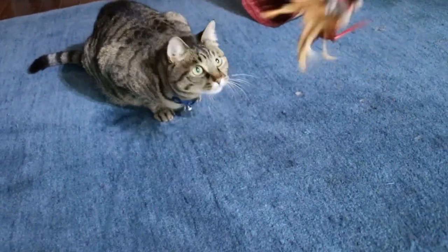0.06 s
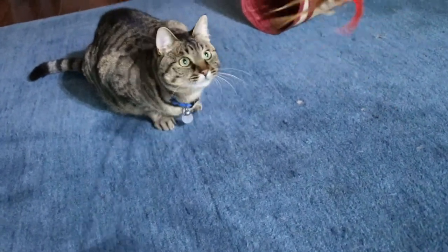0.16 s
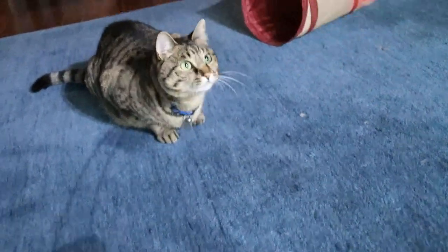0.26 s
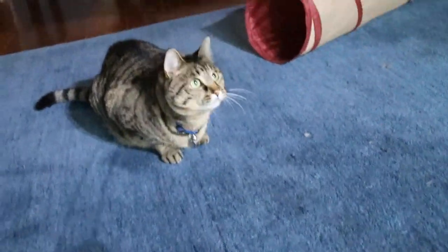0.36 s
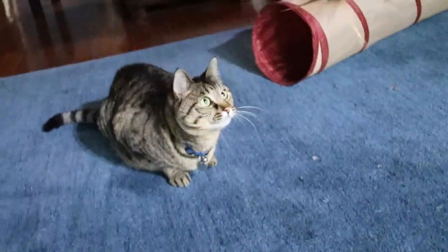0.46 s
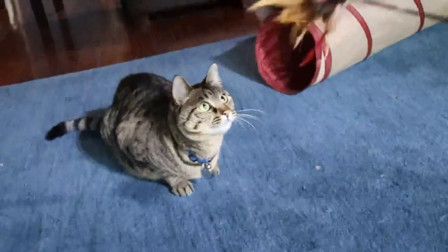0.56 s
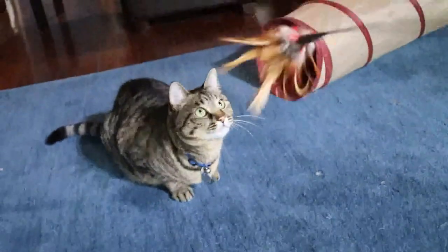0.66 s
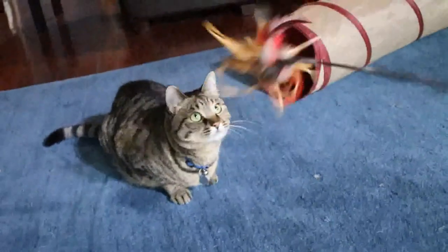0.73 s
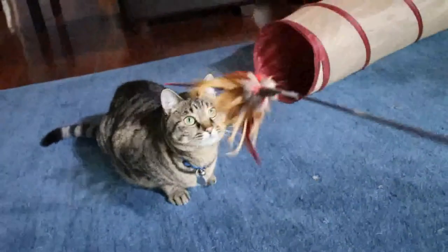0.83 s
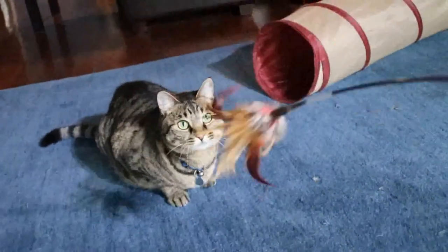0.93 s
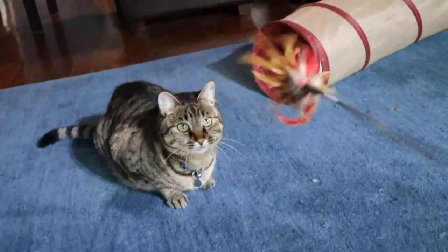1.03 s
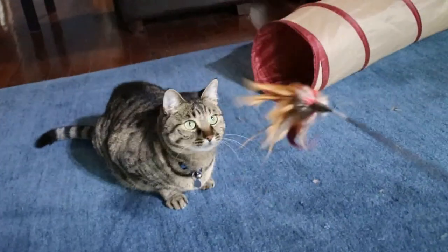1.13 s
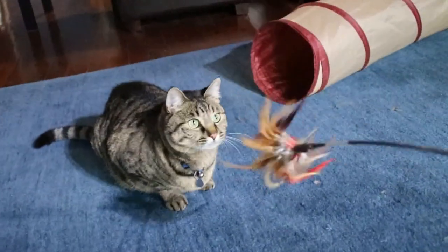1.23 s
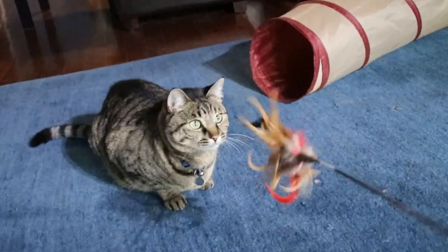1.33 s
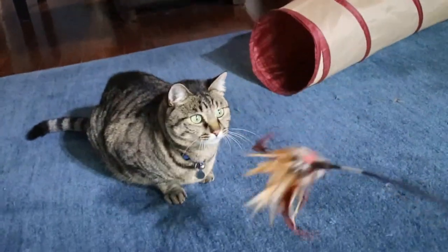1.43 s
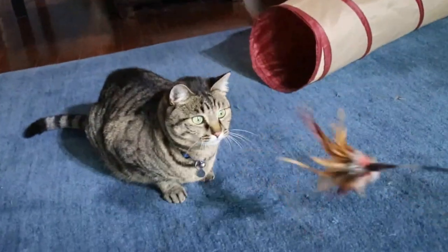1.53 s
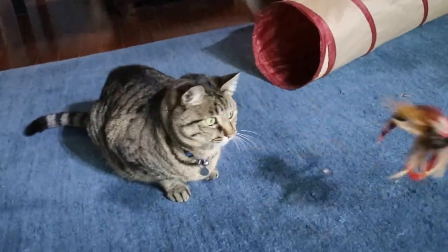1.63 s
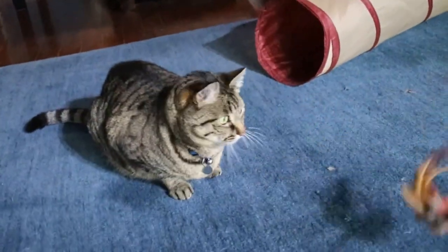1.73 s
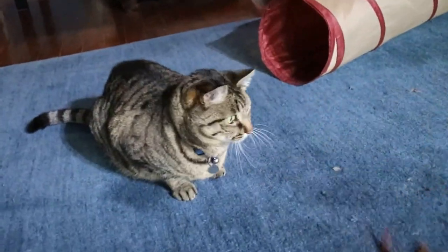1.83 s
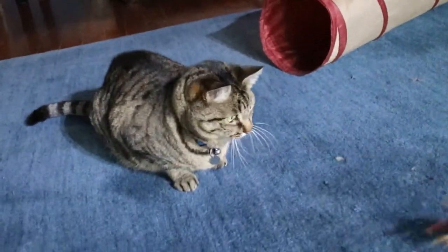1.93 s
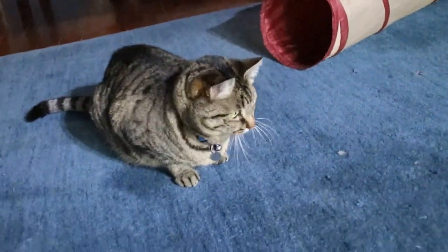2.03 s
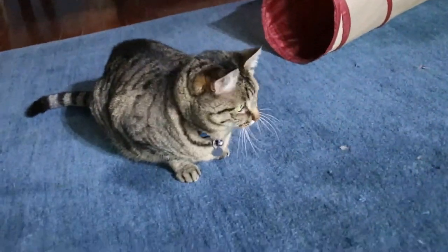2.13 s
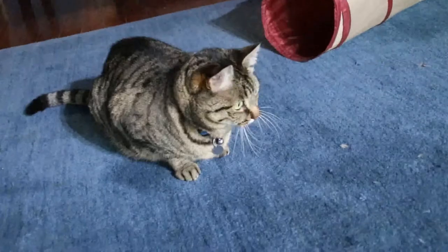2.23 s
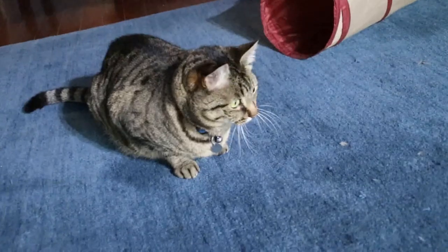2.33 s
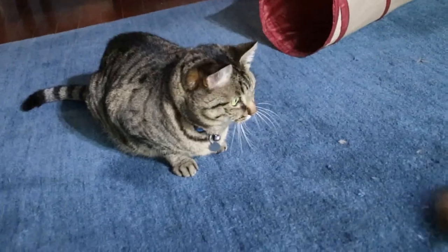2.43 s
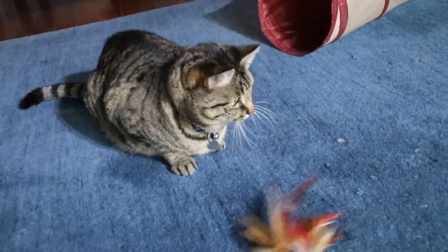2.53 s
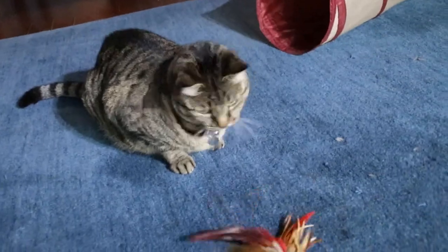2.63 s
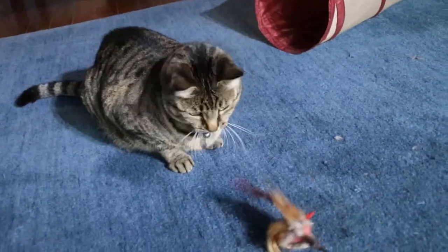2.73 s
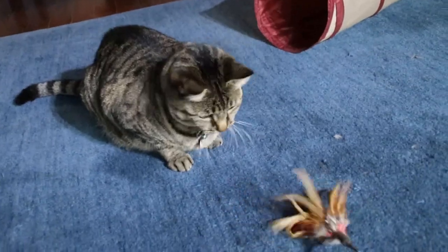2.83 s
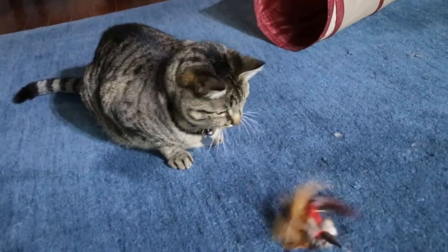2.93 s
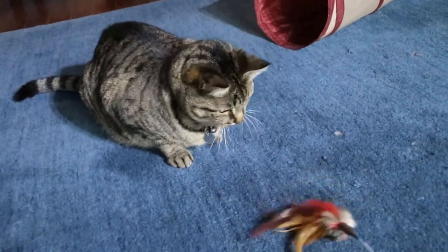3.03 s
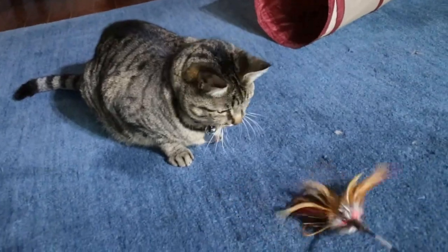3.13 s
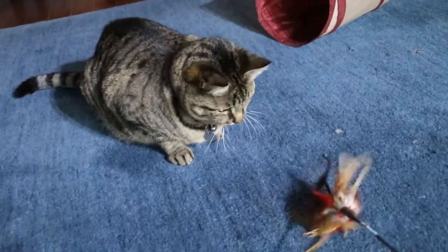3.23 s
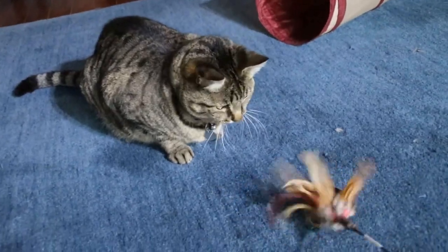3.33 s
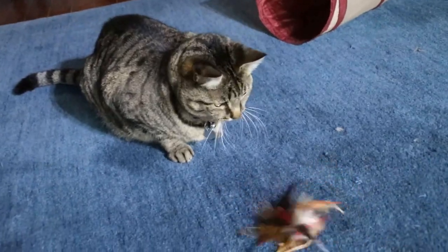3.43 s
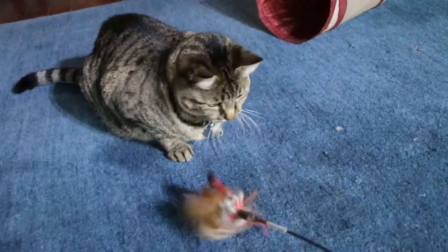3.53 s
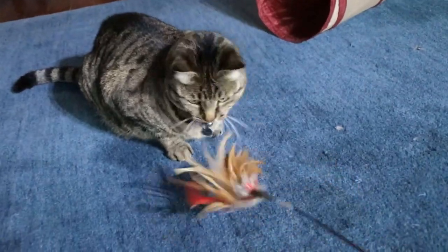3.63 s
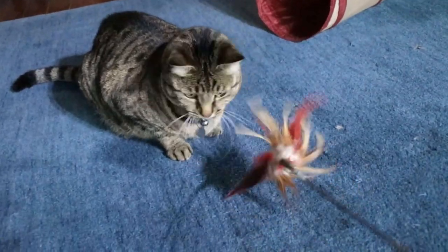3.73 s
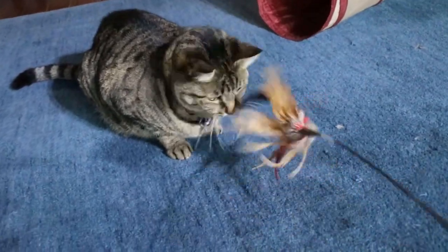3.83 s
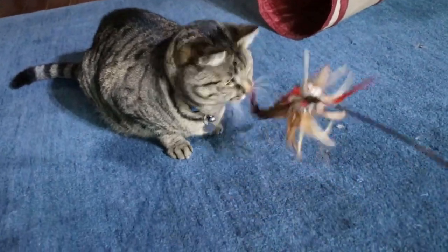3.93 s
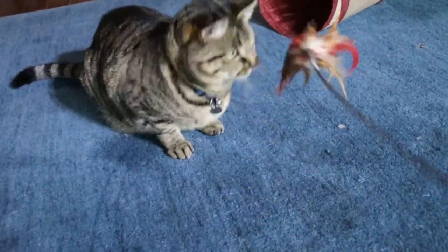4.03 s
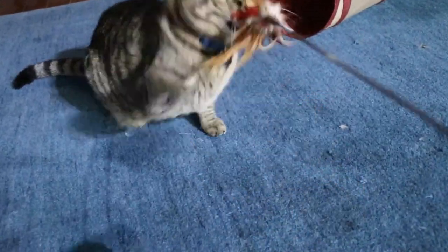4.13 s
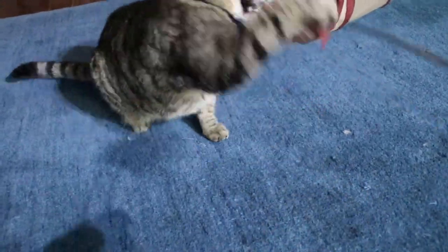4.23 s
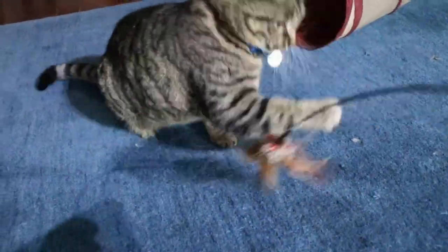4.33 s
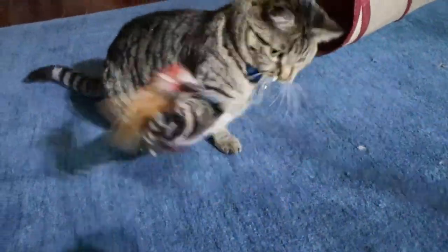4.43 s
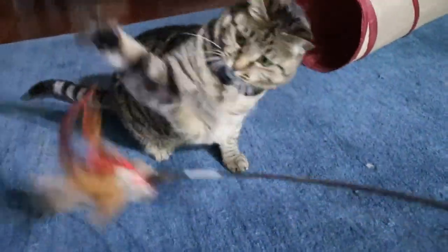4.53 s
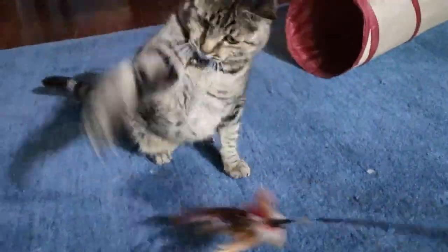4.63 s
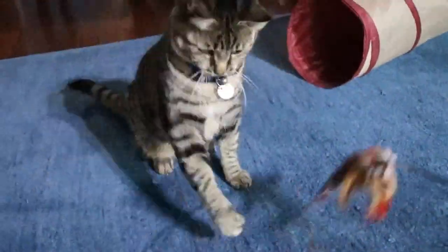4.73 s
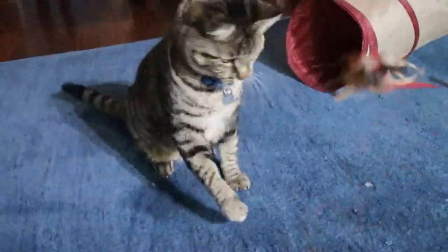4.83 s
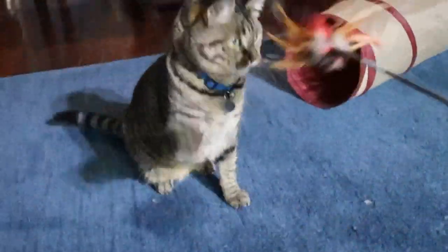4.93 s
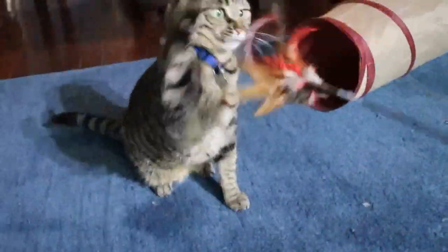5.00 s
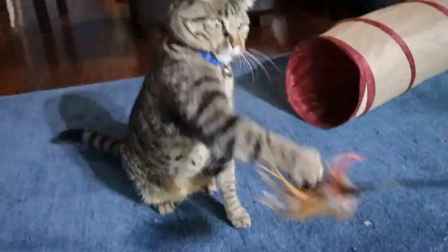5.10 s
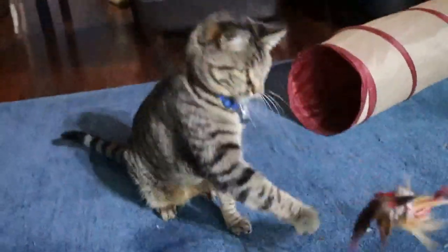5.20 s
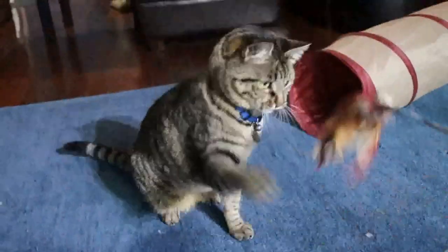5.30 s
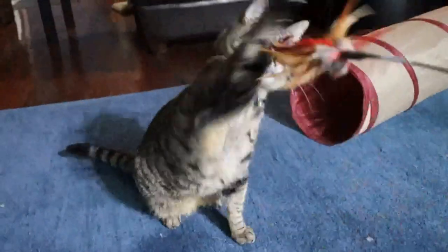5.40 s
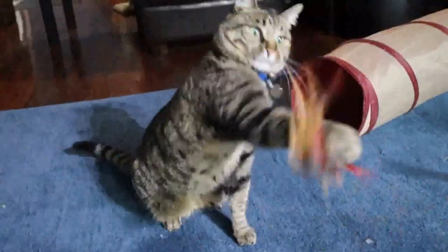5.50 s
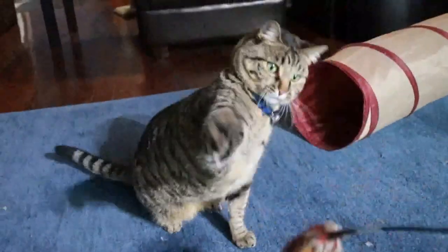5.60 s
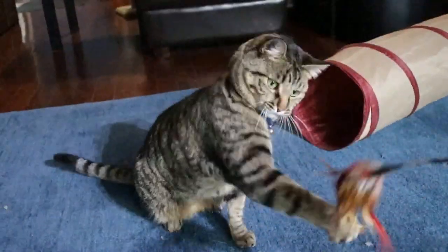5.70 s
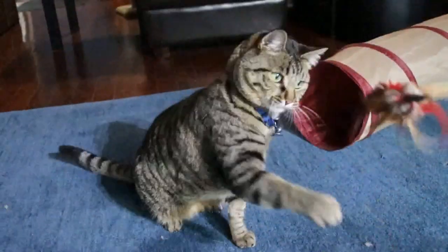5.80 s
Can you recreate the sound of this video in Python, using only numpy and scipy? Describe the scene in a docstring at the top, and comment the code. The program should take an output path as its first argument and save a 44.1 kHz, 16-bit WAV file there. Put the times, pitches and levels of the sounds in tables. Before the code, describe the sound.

Close stereo pickup of a cat playing indoors. Soft bell tinkles open the scene, followed by near stillness broken by two short buzzing motor rattles, very faint air puffs and a light rhythmic rustle of feathers. After about four seconds the bright, thin bell erupts in dense clusters, its pellet skittering inside, with sharp taps and soft swishes. A third clacking motor run overlaps the jingling. Room air and low hum stay underneath.

```python
"""In a carpeted room a cat bats at a feather toy, and the small bell on its collar jingles in bursts.
A pellet strikes the bell's shell, rebounds and rolls; its tones ring and fade as the fur damps them.
The toy's wand clicks as short damped pushes, and its feathers swish as soft puffs of noise.
Three times a small geared motor, likely a camera's focus drive, rattles close by: noise through body
resonances, catching teeth and hard clacks. Under it all lie room air and a low hum."""
import sys
import numpy as np
from scipy import signal
from scipy.fft import rfft, irfft
from scipy.io import wavfile

SR = 44100
rng = np.random.default_rng(int(sys.argv[2]) if len(sys.argv) > 2 else 0)


def wav_record(signal):
    """Record a signal, one row per channel, as 16-bit PCM in the file named by sys.argv[1]."""
    frames = np.transpose(np.atleast_2d(signal))
    bounded = np.clip(frames, -1, 1)
    # unit amplitude maps onto the largest positive 16-bit level
    quanta = np.round(bounded * 32767).astype(np.int16)
    wavfile.write(sys.argv[1], SR, quanta)


N = 258426
TIME = np.arange(N) / SR
FREQ = np.fft.rfftfreq(N, 1 / SR)
SIDES = np.array([[.5], [-.5]])  # left and right halves of a difference


def amp(db):
    """Turn decibels into an amplitude factor."""
    return 10 ** (np.asarray(db) / 20)


def unit(x):
    """Scale to an average power of one."""
    return x / np.sqrt(np.mean(abs(x) ** 2) + 1e-20)


def over_time(points):
    """Join (seconds, value) points with straight lines."""
    return np.interp(TIME, *np.transpose(points))


def over_hz(points):
    """Join (Hz, value) points with straight lines on a logarithmic pitch scale."""
    hz, value = np.transpose(points)
    return np.interp(np.log(FREQ + 1), np.log(hz + 1), value)


def pan(db):
    """Left and right gains for a level difference; positive leans left."""
    return amp(SIDES * db)


def add(mix, s, sound):
    """Mix a short sound in at s seconds, cut off at the end of the scene."""
    part = mix[:, max(round(s * SR), 0):][:, :sound.shape[1]]
    part += sound[:, :part.shape[1]]


def drift(rate_hz, size=8192):
    """A smooth random wander with unit spread."""
    softening = np.exp(-(FREQ[:size // 2 + 1] / rate_hz) ** 2)
    coarse = irfft(rfft(rng.standard_normal(size)) * softening)
    return np.interp(TIME, np.linspace(0, TIME[-1], size), unit(coarse))


def noise_pair(spectrum, likeness):
    """Coloured noise of unit power, partly shared by left and right."""
    a, b = rfft(rng.standard_normal((2, N)))
    c = np.clip(likeness, -1, 1)
    pair = np.array([a, c * a + np.sqrt(1 - c ** 2) * b])
    return unit(irfft(pair * amp(over_hz(spectrum)), N))


def puff(envelope, hz, width, likeness):
    """A short burst of noise in one broad band; width is a share of the centre frequency."""
    shared, *own = rng.standard_normal((3, len(envelope)))
    c = np.clip(likeness, 0, 1)
    burst = (np.sqrt(c) * shared + np.sqrt(1 - c) * np.array(own)) * envelope
    edges = [hz / (1 + width), min(hz * (1 + width), SR / 2 - 1000)]
    band = signal.butter(2, edges, "band", fs=SR, output="sos")
    return unit(signal.sosfilt(band, burst)) * np.sqrt(np.mean(envelope ** 2))


# Colour of the room air. Each row: frequency in Hz, relative level in dB per Hz.
AIR_COLOUR = [(20, -5), (40, -8), (90, -4), (170, -7), (255, 0), (400, -8), (600, -12), (1000, -16),
              (2000, -19), (4000, -21), (8000, -25.5), (13000, -30), (16000, -35)]
# How alike the air is left and right. Each row: frequency in Hz, likeness from 0 to 1.
AIR_LIKENESS = [(60, 0.95), (180, 0.41), (550, 0.19), (1650, 0.39), (4970, 0.26), (15000, 0.36)]
# Appliance hum. Each row: frequency in Hz, level in dB before wavering and panning.
HUM_TONES = [(59.6, -63), (88, -66), (119, -66), (242, -65.5), (355, -80)]
# A low drone that swells and fades. Each row: time in seconds, level in dB before panning.
DRONE_LEVEL = [(3.45, -78), (3.85, -61), (4.35, -53.5), (4.8, -50.5), (5.2, -54.5), (5.45, -58)]
AIR_DB, DRONE_HZ = -52, 121


def room_tone(waver_db=2):
    """Still air is coloured noise; the appliance hum and the drone are sines that wander slightly."""
    def tone(hz, wander):
        return np.sqrt(2) * np.sin(2 * np.pi * hz * TIME + wander * drift(1.7))

    air = amp(AIR_DB) * noise_pair(AIR_COLOUR, over_hz(AIR_LIKENESS))
    hum = sum(amp(db + waver_db * drift(7.8)) * tone(hz, wander=0.25) for hz, db in HUM_TONES)
    drone = amp(over_time(DRONE_LEVEL)) * tone(DRONE_HZ, wander=0.11)
    return air + (hum + drone) * pan(-0.57)


# Hard strikes of the pellet. Each row: start in seconds, base ring level in dB, brightness in dB,
# time in seconds for the ring to fall 60 dB under the fur.
STRIKES = [(0.064, -45, 5.5, 0.04), (0.158, -45, 6.5, 0.2), (0.205, -40, 3, 0.2), (0.225, -37, -7, .12),
           (0.248, -39, 2.5, 0.15), (0.455, -44, 8, 0.057), (4.106, -50, 10, 0.056), (4.14, -36, 0, 0.02),
           (4.182, -40.5, -1, 0.26), (4.206, -27, 0, 0.25), (4.238, -28, 0, 0.2), (4.29, -37.5, 2, 0.37),
           (4.35, -28, -6, .045), (4.371, -32, 5.5, 0.09), (4.378, -19.5, -12, 0.033),
           (4.43, -28.5, -3, .04), (4.483, -29.5, 7.5, 0.25), (4.504, -25, -3, 0.28),
           (4.617, -30.5, -12, 0.11), (4.653, -31.5, -5, 0.044), (4.698, -33, 4.5, 0.12),
           (4.708, -23.5, -6, 0.039), (4.781, -34.5, -9, 0.051), (4.816, -39.5, 9.5, 0.11),
           (4.824, -25.5, -4, 0.057), (4.859, -29.5, -16, 0.1), (4.946, -43, 4, .1),
           (5.069, -35.5, 8.5, 0.13), (5.088, -36, 2, 0.062), (5.141, -24, -1, .05),
           (5.152, -34.5, 3, 0.04), (5.278, -31, -10, 0.28), (5.3, -28, 6.5, .14), (5.448, -28, 2, 0.061),
           (5.572, -30, -14, 0.1), (5.612, -33, -5, 0.16), (5.655, -18, -2, 0.24), (5.735, -30.5, -1, 0.12),
           (5.772, -28, -21, .04)]
# Soft random jiggling while the cat moves. Each row: start and stop in seconds, typical level in dB.
JIGGLES = [(0, .52, -53.5), (4.124, 5.86, -48.5)]
JIGGLE_GAP_S = 0.037
# Rebounds: typical gap, level against the strike, and how fast they weaken.
REBOUND_GAP_S, REBOUND_DB, REBOUND_FADE_DB_PER_S = 0.031, -13, 200


def contacts(uneven=0.62, spread_db=3, t60_s=0.044, count=4):
    """All blows, in the columns of STRIKES: strikes, weakening rebounds, and soft jiggles."""
    rows = list(STRIKES)
    for s, db, bright_db, _ in STRIKES:
        gap, size, colour = rng.standard_normal((3, count))
        delay = np.cumsum(REBOUND_GAP_S * np.exp(uneven * gap))
        level_db = db + REBOUND_DB - REBOUND_FADE_DB_PER_S * delay + spread_db * size
        rows += zip(s + delay, level_db, bright_db + spread_db * colour, np.full(count, t60_s))
    for start, stop, db in JIGGLES:
        gap, size, colour = rng.standard_normal((3, 64))
        times = start + np.cumsum(JIGGLE_GAP_S * np.exp(uneven * gap))
        for s, a, b in zip(times, size, colour):
            if s < stop:
                rows.append((s, db + spread_db * a, spread_db * b, t60_s))
    return np.transpose(rows)


def loudest(s, db, t60):
    """Amplitude of the loudest among many hits, each dying at its own speed."""
    level = np.zeros(N)
    for start, top, life in zip(s, db, t60):
        part = level[max(round(start * SR), 0):][:16384]
        falling = amp(top - 60 * TIME[:len(part)] / max(life, .02))
        part[:] = np.maximum(part, falling)
    return level


# The bell's tones, in three families of close neighbours.
# Each row in a family: frequency in Hz, level in dB within the family.
BELL_FAMILIES = [
    [(4858, 0), (4880, -12), (5096, -14)],
    [(11677, 0), (11790, -12), (12060, -16)],
    [(12958, 0)],
]
# Typical phase difference between left and right, one value in radians for each family.
FAMILY_PHASE = [0.49, 1, 0.78]
# What a strike sets off: three rows for the families, a last one for the pellet's contact tick.
# Each row: level in dB against the base ring level, extra dB per dB of brightness.
VOICING = [(-0.5, 0), (-15.5, 1), (-26.5, 2), (-11, 1.04)]


def bell(blows, kick_rad=0.45, swing_rad=.3, flutter_db=1.56, attack_s=0.00055,
         balance_db=-3.5, sway_db=3.0, graze_rad=0.57, luck_db=2):
    """Blows set off the shell's tones, high ones more when bright; hard strikes also jolt the phase."""
    s, ring_db, bright_db, t60 = blows
    jolts = np.sort([row[0] for row in STRIKES])
    last = np.maximum(np.searchsorted(jolts, TIME, "right") - 1, 0)  # latest hard strike
    side_db = balance_db + sway_db * rng.standard_normal(len(jolts))
    pole = np.exp(-1 / (attack_s * SR))
    main_hz = BELL_FAMILIES[0][0][0]
    out = np.zeros((2, N))
    for family, phase, (offset_db, slope) in zip(BELL_FAMILIES, FAMILY_PHASE, VOICING):
        # where the pellet lands favours a high family by chance
        colour_db = bright_db + luck_db * rng.standard_normal(len(s))
        level = loudest(s, ring_db + offset_db + slope * colour_db, t60)
        # the swinging bell beams differently to each side
        flutter = amp(flutter_db * np.array([drift(130), drift(130)]))
        level = level * flutter * pan(side_db[last])
        for hz, db in family:
            jolt, turn = rng.standard_normal((len(jolts), 2)).T
            angle = np.cumsum(kick_rad * jolt) + SIDES * (phase + swing_rad * turn)
            # the grazing pellet nudges the phase, the high tones most
            angle = angle[:, last] + graze_rad * hz / main_hz * drift(88)
            # smoothing gives each blow a short attack
            envelope = signal.lfilter([1 - pole], [1, -pole], level * np.exp(1j * angle) + 1e-12)
            out += amp(db) * np.sqrt(2) * (envelope * np.exp(2j * np.pi * hz * TIME)).real
    return amp(-2) * out


# Colour of the clatter of pellet on shell. Each row: frequency in Hz, relative level in dB per Hz.
CLATTER_COLOUR = [(4200, -12), (4700, 1.5), (5000, 15), (5500, 0.5), (6100, 7.5), (6700, 0.5), (7400, -7),
                  (8500, -8.5), (10300, -20.5), (11750, -17), (12400, -16), (12950, -13), (14500, -23)]
# Swings of the head send the pellet right round the shell.
# Each row: time of the fastest rolling in seconds, level in dB before the rolling gain,
# half length in seconds.
ROLLS = [(0.516, -66, .06), (4.385, -40, 0.029), (4.521, -40, 0.037), (4.605, -38, 0.027),
         (4.713, -38.5, 0.024), (4.962, -47.5, 0.024), (5.159, -44.5, 0.0095), (5.733, -42, 0.052)]
# After each blow the pellet rolls to rest: level against the blow, time to fall 60 dB.
SETTLE_DB, SETTLE_T60_S = -19, 0.24


def pellet(blows, per_s=800, size_db=-4.5, roll_db=2, contact_s=0.002, likeness=0.33):
    """The pellet ticks at each blow and skitters as it rolls; every contact is a tiny noise burst."""
    def dying(hits):
        return signal.lfilter([1], [1, -np.exp(-1 / (contact_s * SR))], hits)

    s, ring_db, bright_db, _ = blows
    chance, size = rng.random(N), np.minimum(rng.exponential(1, N), 2)
    skitter = unit(dying((chance < per_s / SR) * amp(size_db * size)))
    settling = loudest(s, ring_db + SETTLE_DB, np.full(len(s), SETTLE_T60_S))
    circling = sum(amp(db) * np.exp(-((TIME - middle) / half) ** 2) for middle, db, half in ROLLS)
    rolling = skitter * amp(roll_db) * np.maximum(settling, circling)
    tick_db, slope = VOICING[-1]
    tick_size = 2 * amp(ring_db + tick_db + slope * bright_db)
    ticks = np.bincount(np.round(np.maximum(s, 0) * SR).astype(int), tick_size, N)[:N]
    bursts = (rolling + dying(ticks + 1e-12)) * noise_pair([(1, 0)], likeness)
    return irfft(rfft(bursts) * unit(amp(over_hz(CLATTER_COLOUR))), N) * pan(-0.15)


def ring(drive, modes, spread_rad):
    """Damped modes of unit total energy; each reaches left and right with its own phase."""
    t = TIME[:2048]
    response = 0
    for k, (hz, width, db) in enumerate(modes):
        fade = np.sqrt(width) * np.exp(-np.pi * width * t)
        phase = SIDES * spread_rad * (-1) ** k
        response = response + amp(db) * fade * np.sin(2 * np.pi * hz * t + phase)
    return signal.oaconvolve(drive[None], unit(response) / np.sqrt(len(t)), axes=1)[:, :N]


# Runs of the focus motor. Each row: start and stop in seconds, grind level in dB before its trim,
# typical level of the catching teeth in dB before panning.
MOTOR_RUNS = [(0.802, 1.056, -42.5, -39), (1.067, 1.129, -43, -43), (2.803, 3.186, -42.5, -40.5),
              (5.264, 5.43, -42, -40), (5.44, 5.627, -43.5, -44)]
# The grind heard through the camera body. Each row: frequency in Hz, relative level in dB per Hz.
GRIND_COLOUR = [(40, -15), (88, 1.5), (150, -28), (255, -5.5), (335, -1), (480, -17), (1200, -14.5),
                (2400, -21.5), (3100, -9), (3900, -12), (5200, -15.5), (7000, -20), (12500, -28.5),
                (15500, -43)]
# Body resonances rung by the gears. Each row: frequency in Hz, width in Hz, relative level in dB.
BODY_MODES = [(283, 24, 2), (300, 99, -1), (773, 62, 4), (1714, 120, -2), (2870, 190, 3.5),
              (3124, 110, 5.5), (4210, 57, -8), (5090, 50, -2), (7600, 180, -9), (12400, 1500, -6.5)]


def focus_motor(scrape_db=-2.0, grind_db=-1.0, mesh_hz=90, chatter_db=9):
    """A steady grind while the motor turns; gears chatter through the body, catch and clack."""
    running = np.zeros(N)
    for start, stop, db, _ in MOTOR_RUNS:
        rise = np.clip((TIME - start) / 0.0022, 0, 1)
        fall = np.clip((stop - TIME) / 0.0036, 0, 1)
        running += amp(db) * rise * fall
    # each meshing tooth has its own level and weakens until the next
    mesh = np.cumsum(mesh_hz * (1 + .2 * drift(40))) / SR
    uneven_db = 2.5 * rng.standard_normal(N)[mesh.astype(int)]
    chatter = unit(amp(uneven_db - chatter_db * (mesh % 1)))
    scrape = amp(scrape_db) * running * chatter * rng.standard_normal(N)
    gears = ring(scrape, BODY_MODES, spread_rad=2.16) + catches()
    likeness = over_hz([(100, 0.64), (400, 0.59), (1400, 0.02)])
    grind = amp(grind_db) * running * noise_pair(GRIND_COLOUR, likeness) * pan(0.75)
    return gears * pan(-13.5) + grind + barrel()


def knocks(rows, width, likeness, rise=0.24):
    """Dry noise blows that die within milliseconds; rise is the attack as a share of the decay."""
    out, t = np.zeros((2, N)), TIME[:4096]
    for s, db, decay, hz in rows:
        envelope = np.exp(-t / decay) * (1 - np.exp(-t / (rise * decay))) * (1 + rise)
        add(out, s - rise * decay, amp(db) * puff(envelope, hz, width, likeness))
    return out


# Hard clacks of the lens barrel. Each row: time in seconds, click level in dB and thud level in dB
# before panning, decay of the click in seconds.
CLACKS = [(.806, -32.5, -32, 0.003), (2.807, -21.5, -25.5, 0.0038), (2.841, -18.5, -49, 0.00028),
          (2.856, -36.5, -31, .005), (2.972, -33, -44, 0.0016), (3.1115, -27.5, -45, 0.00086),
          (5.276, -20.5, -27, 0.0046), (5.4427, -33, -33.5, .004), (5.6113, -21.5, -31, 0.0028)]
CLICK_HZ, THUD_HZ, THUD_LONGER = 6000, 730, 1.7  # band centres; the thud's decay against the click's


def barrel():
    """Each clack of the lens barrel is a bright click over a longer thud."""
    clicks = [(s, db, decay, CLICK_HZ) for s, db, _, decay in CLACKS]
    thuds = [(s, db, THUD_LONGER * decay, THUD_HZ) for s, _, db, decay in CLACKS]
    both = knocks(clicks, width=0.98, likeness=0.037) + knocks(thuds, width=1.8, likeness=0.038)
    return both * pan(-2.3)


# The two body resonances that a catching tooth rings, in Hz before a small random detuning.
CATCH_HZ = (3084, 4924)


def tooth(decay, rasp_db=-3.0, upper_db=-7):
    """One gear tooth catches: a short rasp, and two body resonances swell and die."""
    t = TIME[:1024]
    swell = t / decay * np.exp(1 - t / decay)
    detune = rng.uniform(.95, 1.04)
    knock = np.zeros((2, len(t)))
    for hz, db in zip(CATCH_HZ, (0, upper_db)):
        turns = hz * detune * t + rng.random((2, 1)) / 2
        knock += amp(db) * swell * np.sin(2 * np.pi * turns)
    return knock + amp(rasp_db) * puff(np.exp(-t / (2 * decay)), 3400, width=0.66, likeness=0)


# A tooth catches in a loose rhythm: typical gap, scatter of the gap (share), scatter of the level.
CATCH_GAP_S, CATCH_JITTER, CATCH_SPREAD_DB = .017, 0.18, 4.3


def catches(decay=0.0018, count=32):
    """While the motor runs, gear teeth catch in a loose rhythm and at uneven levels."""
    out = np.zeros((2, N))
    for start, stop, _, teeth_db in MOTOR_RUNS:
        gap, size = rng.standard_normal((2, count))
        times = start + np.cumsum(CATCH_GAP_S * np.exp(CATCH_JITTER * gap))
        for s, db in zip(times, teeth_db + CATCH_SPREAD_DB * size):
            if s < stop - 4 * decay:
                add(out, s, amp(db) * tooth(decay))
    return out


# Taps of wand and paws. Each row: time in seconds, level in dB before panning and room,
# decay in seconds, frequency in Hz.
TAPS = [(1.512, -42, 0.0067, 284), (4.357, -31, 0.0014, 2660), (4.3794, -13.5, 0.00031, 920),
        (4.3802, -23, 0.0014, 3780), (4.4306, -22.5, 0.00015, 2550), (4.7083, -24, 0.00067, 1660),
        (4.709, -31, 0.0016, 503), (4.954, -37.5, 0.0016, 560), (5.187, -30, 0.00078, 1200),
        (5.655, -12.5, 0.00015, 915), (5.7803, -27.5, 0.00052, 1120)]


def taps(scuff_db=-15, scuff_longer=7.3, lag_s=.00005):
    """Each tap is one quick, heavily damped push, a touch later on the right, with a faint scuff."""
    out, t = np.zeros((2, N)), TIME[:2048]
    late = np.maximum(t - np.array([[0], [lag_s]]), 0)
    for s, db, decay, hz in TAPS:
        push = np.exp(-late / decay) * np.sin(2 * np.pi * hz * late)
        scuff = puff(np.exp(-t / (scuff_longer * decay)), hz, width=2.04, likeness=0)
        add(out, s, amp(db) * (push + amp(scuff_db) * scuff))
    return out * pan(-2.1)


# Single feather swishes. Each row: time of the middle in seconds, level in dB before the room,
# half length at half height in seconds, centre frequency in Hz.
SWISHES = [(1.885, -59.5, 0.031, 2380), (2.364, -60, 0.048, 3000), (4.336, -50.5, 0.017, 2500),
           (5.202, -49, 0.023, 2110)]
# The toy is shaken in an even rhythm, with a thin swish at every turn.
SHAKE_START_S, SHAKE_PERIOD_S, SHAKE_COUNT = 3.277, .121, 6
SHAKE_DB, SHAKE_HALF_S, SHAKE_HZ = -60, .021, 10500


def feathers():
    """Soft swells of air noise through the toy: single sweeps and a run of quick shakes."""
    out = np.zeros((2, N))
    shake_times = [SHAKE_START_S + k * SHAKE_PERIOD_S for k in range(SHAKE_COUNT)]
    shakes = [(s, SHAKE_DB, SHAKE_HALF_S, SHAKE_HZ) for s in shake_times]
    for s, db, half, hz in SWISHES + shakes:
        swell = signal.windows.hann(round(4 * half * SR))
        add(out, s - 2 * half, amp(db) * puff(swell, hz, width=.6, likeness=.3))
    return out


def room(x, t60_s=0.59, wet_db=-17):
    """The carpeted room adds a short, dying tail of scattered reflections."""
    t = TIME[:16384]
    scattered = rng.standard_normal((2, len(t))) * (rng.random((2, len(t))) < .08)
    tail = scattered * (t > .004) * 10 ** (-3 * t / t60_s)
    return x + amp(wet_db) * signal.oaconvolve(x, unit(tail) / np.sqrt(len(t)), axes=1)[:, :N]


def scene():
    """The cat's play sounds in the room; the close motor and the room tone are added dry."""
    blows = contacts()
    play = bell(blows) + pellet(blows) + taps() + feathers()
    return room_tone() + room(play) + focus_motor()


def record(dry, top_hz=14500, cutoff_hz=16100):
    """The microphones soften the highest treble; a steep filter then removes what lies above."""
    soft = irfft(rfft(dry) / np.sqrt(1 + (FREQ / top_hz) ** 20), N)
    band_limit = signal.firwin(401, cutoff_hz, window=("kaiser", 9), fs=SR)
    return signal.oaconvolve(soft, band_limit[None], "same", axes=1)


dry = scene()
out = record(dry)
wav_record(out)
```